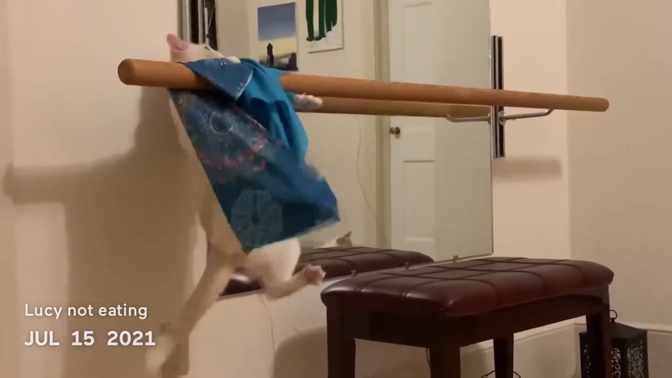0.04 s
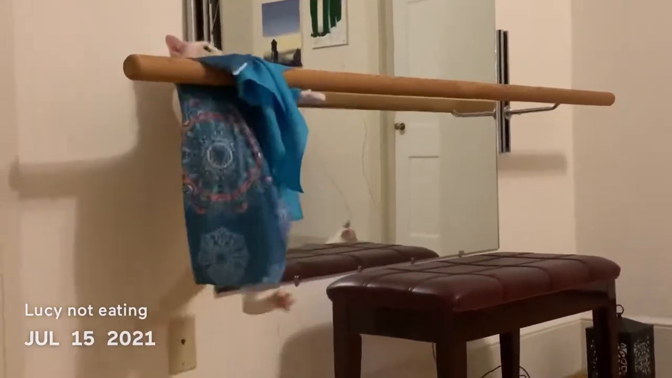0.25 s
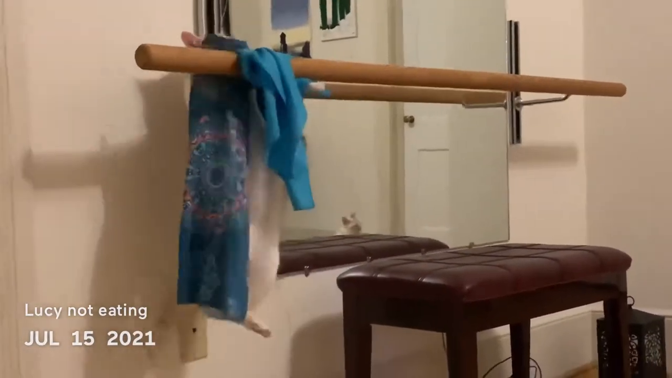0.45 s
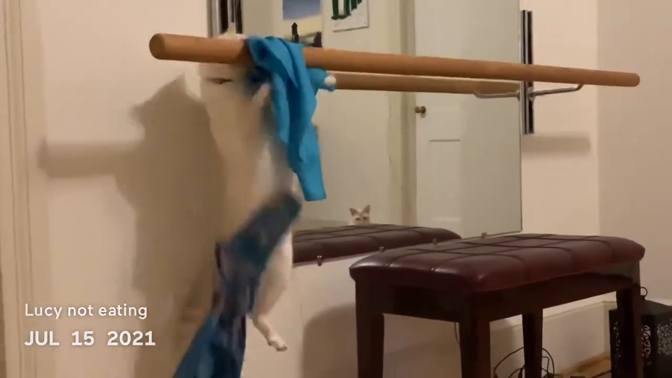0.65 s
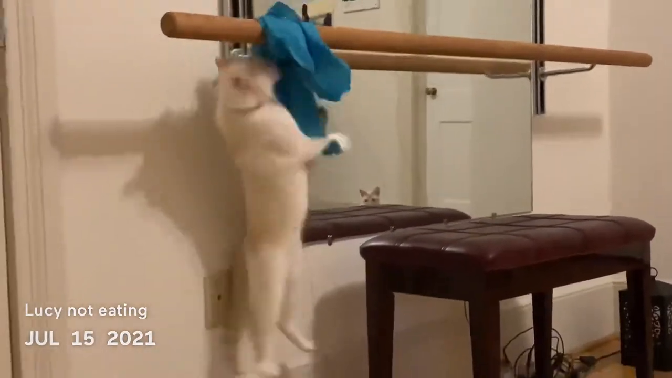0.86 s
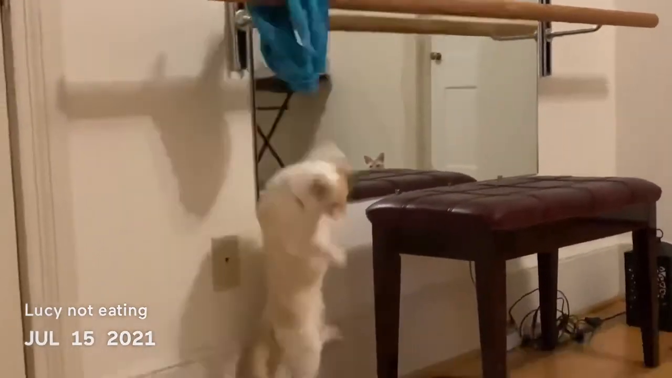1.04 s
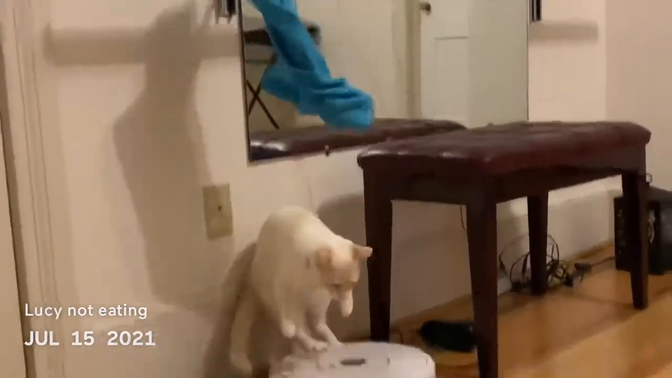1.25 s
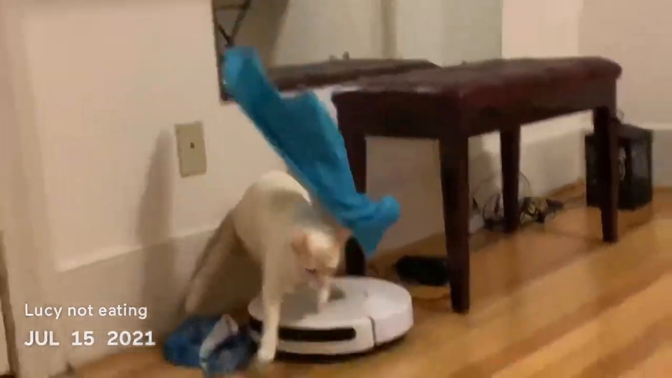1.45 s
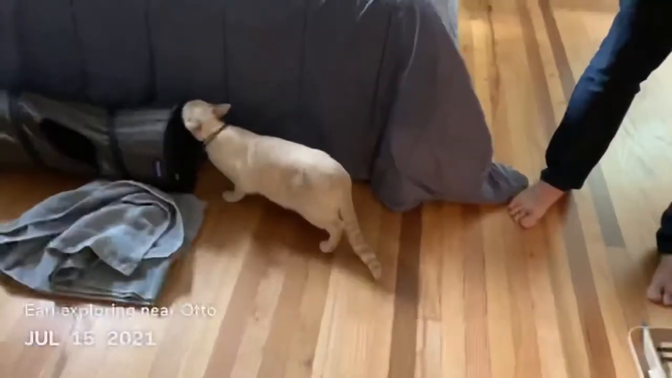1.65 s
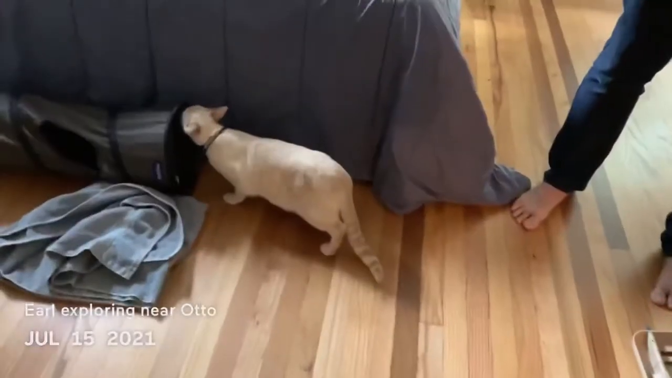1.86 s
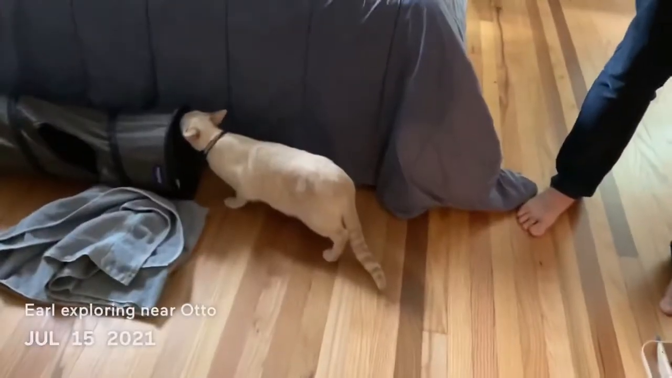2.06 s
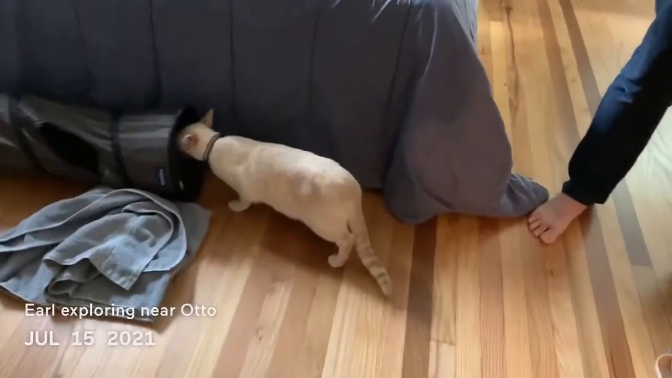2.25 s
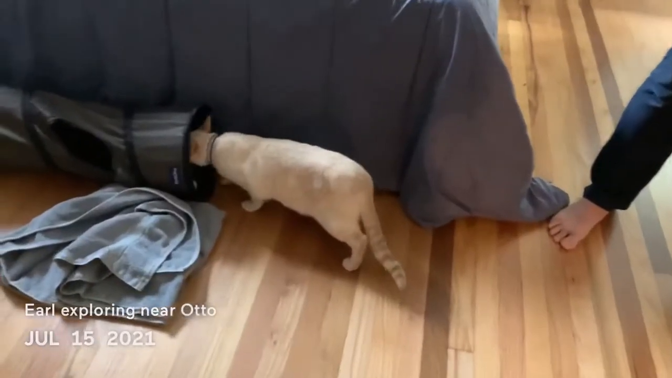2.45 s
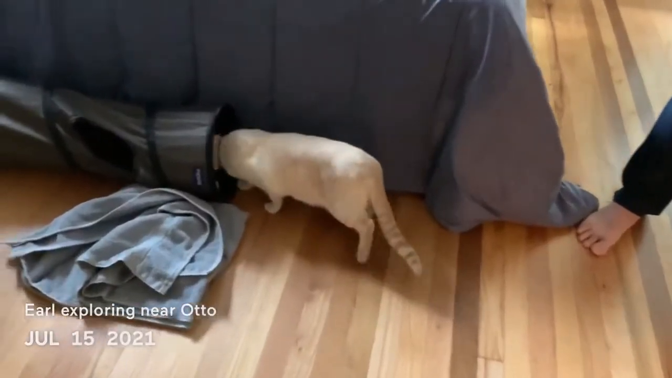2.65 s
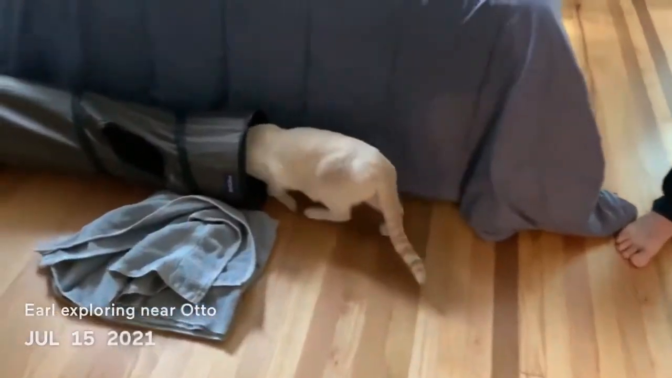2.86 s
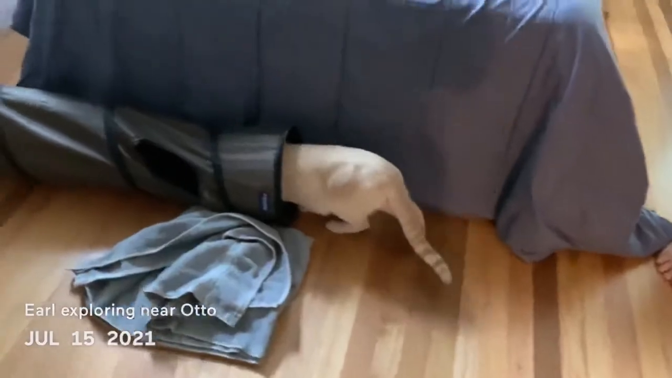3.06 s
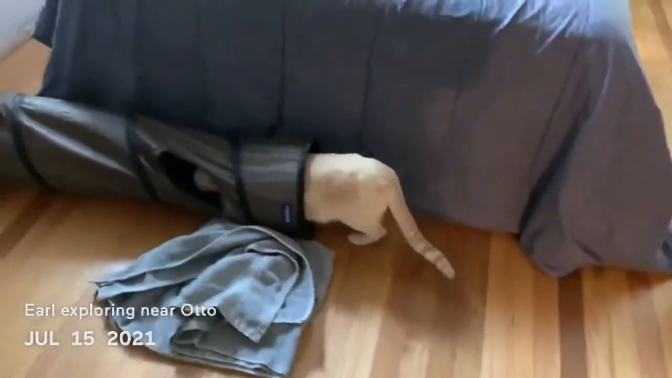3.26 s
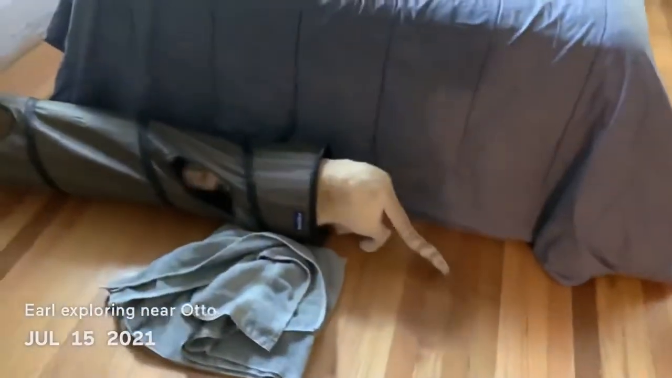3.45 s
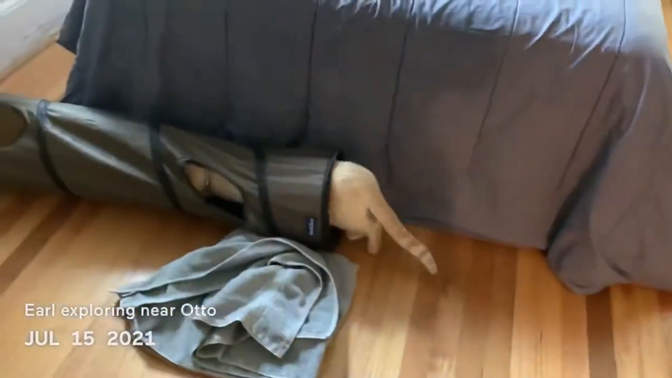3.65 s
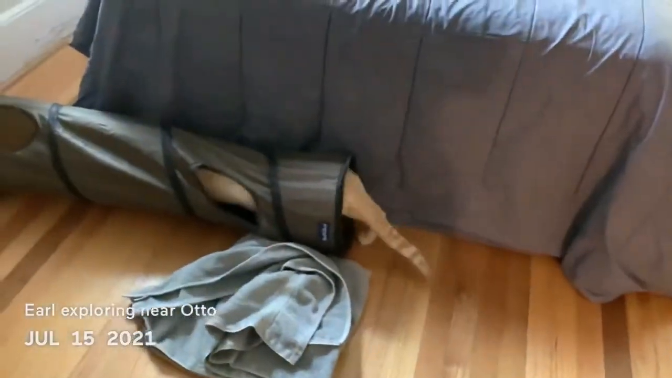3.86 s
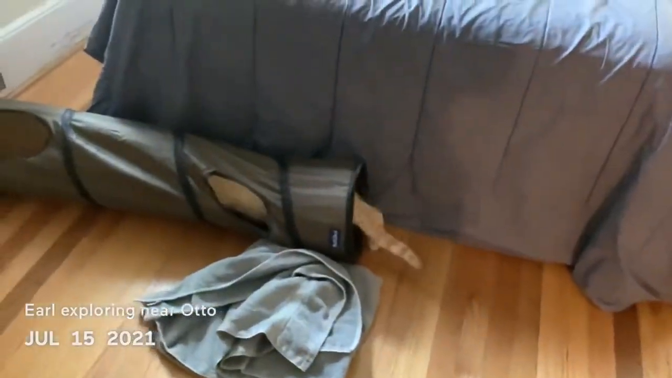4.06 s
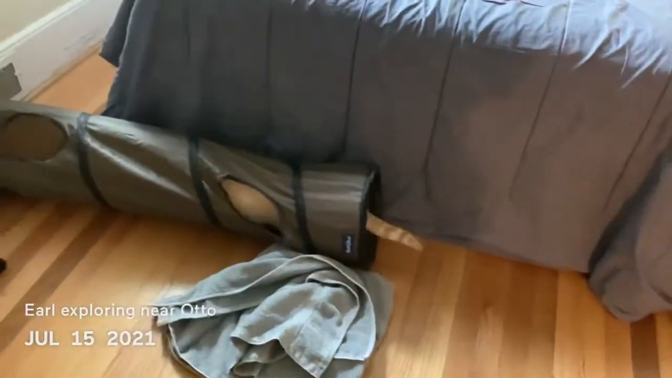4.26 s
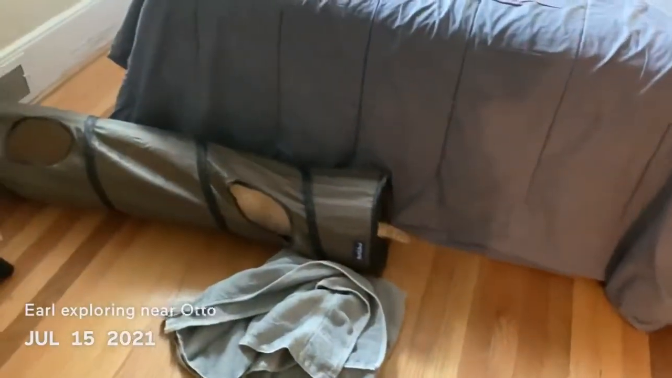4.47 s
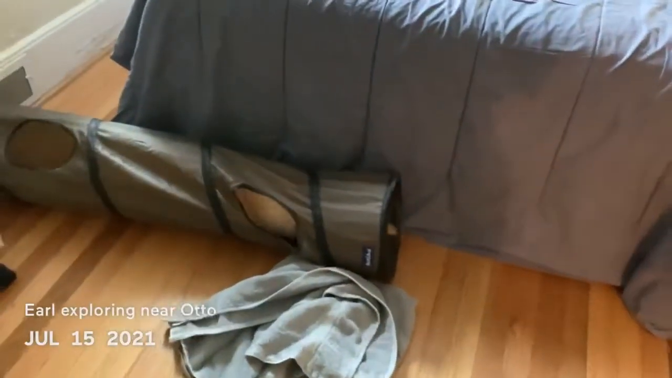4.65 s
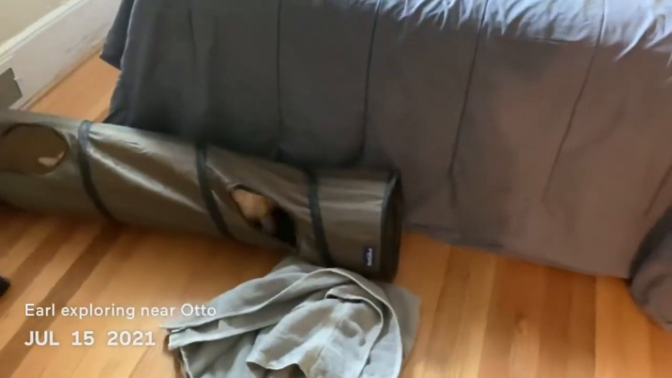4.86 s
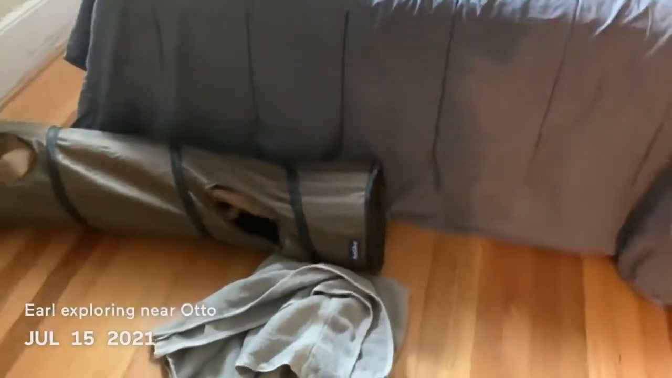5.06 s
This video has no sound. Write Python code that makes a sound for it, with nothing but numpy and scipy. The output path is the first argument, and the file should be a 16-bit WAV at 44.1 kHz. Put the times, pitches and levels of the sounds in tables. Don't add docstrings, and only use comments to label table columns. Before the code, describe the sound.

A cat claws and tugs cloth on a humming wooden bar, drops onto hollow plastic, then another crinkles into a fabric tunnel before a short meow.

```python
import sys
import numpy as np
from scipy import signal
from scipy.fft import rfft, irfft
from scipy.io import wavfile
from scipy.ndimage import uniform_filter1d

SR = 44100
rng = np.random.default_rng(int(sys.argv[2]) if len(sys.argv) > 2 else 0)


def log_audio(samples):
    frames = np.atleast_2d(samples).T
    limited = np.clip(frames, -1, 1)
    pcm = np.round(limited * 32767).astype(np.int16)
    wavfile.write(sys.argv[1], SR, pcm)


def gain_from_db(level_db):
    decades = np.asarray(level_db, float) / 20
    return 10 ** decades


N = 225306
TIME = np.arange(N) / SR
CUT_S = 1.499
IN_HALL = TIME < CUT_S
PORT_LAG = 20


def evened(x):
    return x / np.sqrt(np.mean(x ** 2) + 1e-20)


def peaked(x):
    return x / np.abs(x).max()


def read(points, hz):
    f, value = np.transpose(points)
    return np.interp(np.log(hz + 1), np.log(f + 1), value)


def add(mix, s, sound):
    part = mix[:, round(s * SR):][:, :sound.shape[1]]
    part += sound[:, :part.shape[1]]


def smoothed(x, size):
    return uniform_filter1d(uniform_filter1d(x, size), size)


def band(x, lo_hz, hi_hz):
    edges = [lo_hz, min(hi_hz, .45 * SR)]
    return signal.sosfilt(signal.butter(2, edges, "band", fs=SR, output="sos"), x)


def steep_band(x, lo_hz, hi_hz):
    return band(band(x, lo_hz, hi_hz), lo_hz, hi_hz)


def resonate(x, modes):
    out = 0
    for hz, width, db in modes:
        r = np.exp(-np.pi * abs(width) / SR)
        poles = [1, -2 * r * np.cos(2 * np.pi * hz / SR), r * r]
        out = out + gain_from_db(db) * signal.lfilter([(1 - r * r) / 2, 0, (r * r - 1) / 2], poles, x)
    return out


def gestures(starts, holds, dbs, releases, rise):
    t = np.arange(0, N / SR + .01, .001)[:, None]
    fall = np.maximum(releases, .01)
    before = np.maximum(starts - t, 0) / (max(rise, .01) * fall)
    after = np.maximum(t - starts - abs(holds), 0) / fall
    power = gain_from_db(dbs - 20 * (before + after)) ** 2
    return np.interp(TIME, t[:, 0], np.sqrt(power.sum(1)))


# f/Hz, likeness [0-1]
PORT_LIKENESS = [(60, 0.85), (130, 0.96), (290, 0.67), (640, 0.092), (1400, 0.048), (3100, 0.29),
                 (6800, 0.34), (15000, 0.2)]


def coloured(x, spectrum):
    hz = np.fft.rfftfreq(N, 1 / SR)
    left, other = rfft(x)
    same = np.clip(read(PORT_LIKENESS, hz), -1, 1)
    delayed = left * np.exp(-2j * np.pi * hz * PORT_LAG / SR)
    right = same * delayed + np.sqrt(1 - same ** 2) * other
    return evened(irfft(np.array([left, right]) * gain_from_db(read(spectrum, hz)), N))


def room(x, decays):
    taps = np.zeros((2, SR))
    at = np.arange(300, SR - 20, 20)
    at = at + rng.integers(0, 20, (2, len(at)))
    np.put_along_axis(taps, at, rng.choice([-1., 1.], at.shape), 1)
    hz, t, z = signal.stft(taps, SR, nperseg=256)
    t60 = np.maximum(read(decays, hz), .05)[:, None]
    tail = signal.istft(z * gain_from_db(-60 * t / t60), SR, nperseg=256)[1]
    return signal.fftconvolve(x, tail / np.linalg.norm(tail[0]), axes=1)[:, :N]


# f/Hz, level/dB per Hz
HALL_TONE = [(20, -8), (60, -3.5), (110, -11.5), (240, -21.5), (500, -33), (1300, -31.5), (3500, -33.5),
             (7000, -58), (10000, -70), (15000, -44)]
BEDROOM_TONE = [(20, -21.5), (59, -3), (170, -10.5), (260, -11), (450, -21), (940, -30.5), (1500, -36.5),
                (2200, -37.5), (3500, -38.5), (7200, -46), (8600, -37), (10800, -40.5), (15000, -40)]


def air(in_hall):
    spectrum, db = (HALL_TONE, -53.5) if in_hall else (BEDROOM_TONE, -65)
    drift = smoothed(rng.standard_normal((2, N)), 2500)
    tone = coloured(rng.standard_normal((2, N)), spectrum)
    low = signal.sosfiltfilt(signal.butter(2, 600, fs=SR, output="sos"), tone)
    hiss = gain_from_db(0.87 * evened(drift[0])) * (tone - low)
    rumble = gain_from_db(4.46 * evened(drift[1]) - 1.5) * low
    return gain_from_db(db) * (hiss + rumble)


def loads(rows, rise, rings):
    s, hum_db, knock_db, release = np.transpose(rows)
    hum = gestures(s, 0 * s, hum_db, rings * release, rise)
    return np.array([hum, gestures(s, 0 * s, knock_db, release, rise)])


# t/s, hum level/dB, creak level/dB, release/s per 20 dB
JERKS = [(0.0, -61.5, -64, -0.3), (.108, -50.5, -74, 0.6), (.25, -59, -61, 0.4), (.39, -46.5, -64, 0),
         (.43, -64, -71, 5), (.564, -34, -59, -0.7), (.61, -40.5, -69, -0.4), (.7, -42, -74, 0.2),
         (.81, -32, -37, 0.22), (.9, -38, -65, 0.27), (1.0, -33, -34, 0.32), (1.128, -41, -47, -0.63),
         (1.25, -37, -67, 0.1), (1.345, -51, -31.5, .13)]
# t/s, sway level/dB, footfall level/dB, release/s per 20 dB
STEPS = [(1.57, -63, -67, 0), (1.7, -70, -58.5, 0.03), (1.84, -62, -79, 1.2), (2.06, -62, -69, 0.2),
         (2.31, -59, -51, 0.26), (2.58, -54, -75, 0), (2.73, -49, -57.5, 0.3), (2.9, -54, -57, .5),
         (3.3, -62, -64.5, 0.6), (3.46, -58, -65, 0.23), (3.58, -63, -63.5, 0.2), (3.67, -57, -60.5, 0.3),
         (3.74, -50, -73, -0.1), (3.84, -47.5, -69, 0), (3.96, -55, -69, -1.9), (4.03, -55.5, -66, 0.43),
         (4.26, -59, -65.5, 0.6), (4.4, -93, -88, 9), (4.51, -81, -63, 0.7), (4.75, -51.5, -56.5, 0.08),
         (4.8, -46, -71.5, -0.94), (4.89, -63, -63.5, 0), (5.08, -68, -65, -0.6)]
# f/Hz, width/Hz, level/dB
BAR = [(72, 1.36, 7.5), (56.5, 5.7, -8.5)]
FLOOR = [(56.1, 17, 0)]
BOARDS = [(127.1, 24, 7), (163.3, 22, 3.5), (227.4, 45, 1), (291, 14, 2), (365, 9.2, -6), (424, 25, -8.5)]
LID = [(252, 30, -9), (299.3, 29, -1.5), (362, 31, -1.5), (428.5, 18, -4)]


def weight():
    jerks = loads(JERKS, rise=0.11, rings=2.8)
    steps = loads(STEPS, rise=0.52, rings=1)
    sway, knock = np.where(IN_HALL, jerks, steps)
    shake, lumps = rng.standard_normal(N), rng.standard_normal((2, N))
    bar = resonate(shake, BAR)
    bar = bar / np.sqrt(uniform_filter1d(bar ** 2, 5000))
    hum = np.where(IN_HALL, bar, evened(resonate(resonate(shake, FLOOR), FLOOR)))
    lumps = lumps + 2.55 * lumps[0]
    on_lid = abs(TIME - 1.41) < .09
    lid = evened(resonate(resonate(lumps, LID), LID) + 0.19 * resonate(lumps, BOARDS[:2]))
    wood = np.where(on_lid, lid, evened(resonate(lumps, BOARDS)))
    return gain_from_db(-5.5) * sway * hum + gain_from_db(-1.5) * knock * evened(band(wood, 134, 475))


# t/s, level/dB peak, f/Hz, t60/s
KNOCKS = [(.807, -33, 488, .06), (1.046, -37, 2037, 0.096), (1.062, -29, 607, 0.025),
          (1.122, -37.5, 121, 0.077), (1.0, -29.5, 312, 0.11), (2.29, -50, 302, 0.088),
          (2.335, -50, 320, 0.14), (2.7, -53, 109, .1), (2.844, -50.5, 1218, .07), (2.884, -50, 202, .05),
          (2.986, -42.5, 175, 0.037), (3.0, -49, 2146, 0.06), (3.045, -49.5, 2150, .04),
          (3.44, -54.5, 280, 0.041), (3.455, -56, 51.6, 0.11), (3.646, -52, 112, .06),
          (3.955, -52.5, 240, 0.06),
          (.9855, -25, 150, .035),
    (.989, -30, 320, .05),
    (1.3435, -25, 300, .025),
    (.813, -30, 140, .04),
    (1.36, -34, 365, .16),
    (1.4, -34, 390, .12),
]
# t/s, level/dB peak
CLINKS = [
    (1.216, -46.5),
    (1.2255, -35),
]
# f/Hz, width/Hz, level/dB
STEEL = [(6600, 25, -2), (8850, 25, -5), (9900, 90, -2), (10500, 150, 0), (12900, 60, -6), (14800, 80, -7)]


def knocks():
    out, t = np.zeros((2, N)), np.arange(8000) / SR
    for s, db, hz, t60 in KNOCKS:
        ring = gain_from_db(db - 60 * t / max(t60, .01)) * np.sin(2 * np.pi * hz * t)
        add(out, s, np.array([ring, np.roll(ring, PORT_LAG * (hz < 700))]))
    for (s, db), noise in zip(CLINKS, rng.standard_normal((len(CLINKS), 8000))):
        strike = noise * np.exp(-t / 0.0014)
        steel = peaked(sum(gain_from_db(m[2]) * peaked(resonate(strike, [m])) for m in STEEL))
        clink = gain_from_db(db) * (steel * .5 + peaked(band(strike, 6000, 16000)))
        add(out, s, np.array([clink, np.roll(clink, PORT_LAG)]))
    return out


def strokes(rows, rise, treble):
    s, hold, db, bright_db, release = np.transpose(rows)
    body = gestures(s, hold, db, release, rise)
    return np.array([body, gestures(s, hold, db + bright_db, treble * release, rise)])


# t/s, hold/s, level/dB, brightness/dB, release/s per 20 dB
DRAGS = [
    (0.0, 0.6, -52.5, -0.5, -1.3),
    (.33, 0.012, -48.5, -0.5, 0.3),
    (.741, 0.049, -44, -15, -0.96),
    (.797, 0.037, -35, -4, -0.09),
    (.968, 0.028, -39.5, -4.5, 0.68),
    (1.045, 0.021, -42.5, 10.5, 0.0658),
    (1.218, 0.037, -50, 7.5, 0.1),
    (1.333, 0.0053, -47, 14.5, 0),
]
# t/s, hold/s, level/dB, brightness/dB, release/s per 20 dB
PUSHES = [(1.58, 0.25, -70, -16, 0.6), (2.082, 0.1, -63, 5, 0.5), (2.28, 0.017, -56.5, 9, 0.42),
          (2.516, 0.0085, -65, -3, 0.5), (2.62, 0.043, -72, -14, .2), (2.718, 0.0059, -64, 2, 0.9),
          (2.846, .01, -52.5, -29, 0.27), (2.92, .01, -52, -8, 0.13), (2.888, 0.016, -53, -1.5, 0.35),
          (2.948, 0.026, -48.5, -21, 0.28), (3.0, 0.047, -47, -10.5, 0.09), (3.045, 0.032, -53, -8, -0.14),
          (3.1, 0.01, -58, -8, 0.37), (3.59, 0.03, -60.5, -4.5, 0.9), (3.643, 0.0049, -48, -2, 0.33),
          (3.75, 0.02, -69, -4, 0.3), (3.88, .02, -70.5, -1, 0.6), (4.12, 0.04, -65.5, -3, 2.2),
          (4.405, 0.018, -65.5, 0.5, 0.95), (4.735, 0.13, -65, 1.5, 0.6)]
# t/s, hold/s, level/dB, release/s per 20 dB
NAP = (3.39, .19, -76, .1)
# f/Hz, level/dB per Hz
CLOTH = [(150, -12.5), (414, -6), (1170, -9), (2550, -10.5), (5000, -23), (7500, -28.5), (10000, -28),
         (13500, -38.5), (15000, -36)]
# f/Hz, width/Hz, level/dB
CLOTH_RING = [(1620, 60, 1), (2500, 70, 7.5), (3550, 120, 4)]


def rubbing():
    drags = strokes(DRAGS, rise=0.4, treble=1.5)
    pushes = strokes(PUSHES, rise=0.072, treble=0.36)
    body, treble = np.where(IN_HALL, drags, pushes)
    clumps = gain_from_db(2.5 * evened(smoothed(rng.standard_normal(N), 250)))
    sizes = gain_from_db(1.54 * np.minimum(rng.exponential(1, (2, N)), 5))
    slips = clumps * sizes * (rng.random((2, N)) < 2500. / SR)
    fibres = evened(slips * rng.standard_normal((2, N))) + 1.2 * rng.standard_normal((2, N))
    cloth = coloured(fibres, CLOTH)
    taut = (TIME < .6) * resonate(cloth, CLOTH_RING) * .9
    nap = gestures(*np.transpose([NAP]), .5) * evened(steep_band(cloth, 1600, 3200))
    rub = gain_from_db(-6.5) * body * (evened(band(cloth, 260, 2150)) + taut)
    return nap + rub + gain_from_db(-9.5) * treble * evened(band(cloth, 2910, 24000))


def blows(events, hollow, ring_width, crack_s, thud_s, thud_db, thin_db, pan_db):
    near, walls, t = np.zeros((2, N)), np.zeros((2, N)), np.arange(6000) / SR
    bands = (500, 2710), (3000, 7000), (7500, 17600)
    pan = gain_from_db(np.array([[.5], [-.5]]) * pan_db)
    for (s, peak_db, hz, edge_db, tick_db), noise in zip(events, rng.standard_normal((len(events), 2, 6000))):
        snap = 1. * (t == 0)
        crack = noise[0] * np.exp(-t / crack_s)
        gains = gain_from_db(peak_db + np.array([0, edge_db - 8, tick_db + 8.5]))
        plain, direct = [sum(g * peaked(steep_band(x, *b)) for g, b in zip(gains, bands))
                         for x in (snap, 6.0 * snap + crack)]
        octaves = np.log2(hz / 1e3)
        ring = peaked(resonate(crack, [(hz, ring_width * hz / 1e3, 0)]))
        ring = gain_from_db(peak_db - 1 - 4 * octaves) * ring
        push = noise[1] * t / thud_s * np.exp(-t / thud_s)
        thud = gain_from_db(peak_db + thud_db - thin_db * octaves) * peaked(resonate(push, hollow))
        add(near, s, pan * (np.array([direct, np.roll(direct, PORT_LAG)]) + 1.6 * ring + thud))
        echoed = plain + .4 * thud + .35 * ring
        add(walls, s, np.array([echoed, echoed]))
    return np.array([near, walls])


# t/s, level/dB peak, ring f/Hz, edge level/dB, tick level/dB
KICKS = [
    (.553, -62.5, 613, -30, -35),
    (.59, -70, 626, -31, -37),
    (.68, -72, 576, -34, -35),
    (.705, -72, 600, -30, -35),
]
# f/Hz, width/Hz, level/dB
WALL = [(78, 19, -12), (126, 12, 12)]


def kicks():
    return blows(KICKS, WALL, ring_width=170.0, crack_s=0.002, thud_s=0.0092, thud_db=20.5, thin_db=-3.5, pan_db=1.5)


# t/s, level/dB peak, ring f/Hz, edge level/dB, tick level/dB
SNAPS = [(1.665, -69, 1860, 8, -26.5), (1.804, -71, 918, 8, -4), (2.083, -48.5, 1760, -20, -6),
         (2.168, -50.5, 2220, -23, -13), (2.221, -46.5, 1660, 4.5, 0), (2.246, -48.5, 1240, -29, -6),
         (2.288, -39.5, 1030, -32, -1.5), (2.335, -39.5, 1100, -3, -7.5), (2.514, -46.5, 1970, -2.5, -4.5),
         (2.717, -45.5, 2220, -2, -25), (2.844, -49, 1150, -30, -44), (2.883, -48, 2240, -14, -9),
         (2.888, -54.5, 2500, -8, -2), (2.918, -51, 1990, -49, -27), (2.947, -53.5, 1060, -35, -38),
         (2.959, -49.5, 820, -22, -36), (2.999, -48.5, 890, -28, -28), (3.044, -48, 815, -21.5, -22),
         (3.1, -71, 900, -30, -43), (3.641, -39.5, 2050, -6, -16), (4.408, -58.5, 1820, -42, -21),
         (4.731, -55.5, 1160, -19, -7), (4.744, -55, 835, -17, -8), (4.869, -52, 2700, -31, -16),
         (5.073, -69.5, 890, 22, -1)]
# f/Hz, width/Hz, level/dB
TUNNEL = [(191, 30, -3), (290, 80, 7.5), (494, 93, -11)]


def snaps():
    return blows(SNAPS, TUNNEL, ring_width=130.0, crack_s=0.0027, thud_s=0.0085, thud_db=-2.5, thin_db=6.0, pan_db=-2.0)


# t/s, pitch f/Hz, effort level/dB, first harmonic level/dB, second harmonic level/dB
MEOW = [
    (4.03, 425, -73, 6, -10),
    (4.09, 520, -69, 5, -9),
    (4.12, 606, -65, -8, 0),
    (4.17, 622, -61, -7, 6),
    (4.25, 636, -61, 4, -3),
    (4.4, 636, -61, 1, -5),
    (4.49, 612, -61.5, -9, -1),
    (4.56, 594, -65, 5, -6),
    (4.66, 580, -73, 3, -4),
]
# f/Hz, level/dB
THROAT = [(550, -2), (650, 4), (1250, 0), (1900, -4), (2550, -8), (3150, -31), (3800, -27), (4450, -14),
          (5100, -40), (5750, -42), (6350, -27), (7000, -50)]
# f/Hz, width/Hz, level/dB
JAW = [(1165, 60, 8)]


def meow():
    s, *columns = np.transpose(MEOW)
    hz, effort_db, first_db, second_db = [np.interp(TIME, s, c) for c in columns]
    open_db = np.maximum(hz - 625, -45) * .1
    weak_db = np.clip(-57 - effort_db, 0, 14)
    creak = np.exp(-((TIME - 4.148) / .04) ** 4)
    closing = np.clip((TIME - 4.42) / .03, 0, 1)
    waver = evened(smoothed(rng.standard_normal((13, N)), 330))
    turns = np.cumsum(hz * (1 + (.006 + .0025 * weak_db) * waver[0])) / SR
    flutter = .8 * np.cos(2 * np.pi * np.cumsum(70 * (1 + .4 * waver[11])) / SR)
    upper = 0
    for k in range(2, 11):
        db = read(THROAT, k * hz) + open_db * np.log2(k) + second_db * (k == 2) + 4 * waver[k]
        upper = upper + gain_from_db(db) * np.cos(2 * np.pi * k * turns)
    halves = sum(np.cos(2 * np.pi * k * turns) for k in (1.5, 2.5))
    halves = creak * gain_from_db(-9 + 4 * waver[12]) * halves
    first = gain_from_db(first_db + (1.5 + 3 * closing) * waver[1]) * np.cos(2 * np.pi * turns)
    voice = (1 + closing * flutter) * first + (1 + flutter) * upper + halves
    voice = voice + closing * resonate(voice, JAW)
    breath = evened(band(rng.standard_normal(N), 650, 1300)) * (1 + np.cos(2 * np.pi * turns))
    breath = gain_from_db(-28 + 1.5 * weak_db + 12 * creak + 4 * closing) * breath
    gate = np.clip((TIME - s[0]) / 0.02, 0, 1) * np.clip((s[-1] - TIME) / 0.03, 0, 1)
    pan = gain_from_db(np.array([[-.6], [.6]]))
    return gain_from_db(effort_db - 1.5) * gate * (voice + breath) * pan


# t/s, level/dB peak, ring f/Hz, edge level/dB, tick level/dB
LANDING = [
    (1.328, -30.5, 2110, -2, -14.5),
    (1.344, -47.5, 570, -32, -42),
    (1.361, -51, 496, 19, -36),
    (1.403, -45, 526, -28, -28),
]


def landing():
    return blows(LANDING, LID, ring_width=140.0, crack_s=0.0037, thud_s=0.013, thud_db=-1.7, thin_db=4.0, pan_db=-4.0)


# t/s, level/dB peak, ring f/Hz, edge level/dB, tick level/dB
CLAWS = [(0.621, -58, 890, -20, -31), (0.74, -46, 595, -36, -37), (0.804, -38, 540, -27.5, -16),
         (0.974, -43.5, 705, -35, -29), (0.984, -35.5, 1330, -21.5, -13), (0.995, -35, 567, -35.5, -13.5),
         (1.048, -28.5, 1920, -17, -15.5), (1.066, -41, 594, -27.5, -29), (1.035, -35, 2280, -20, -19),
         (1.08, -39.5, 1900, -23, -20), (1.1, -40.5, 1500, -21, -25)]
# f/Hz, width/Hz, level/dB
BRACKET = [(156, 80, -3), (335, 70, -3.5), (565.7, 11, 4.5)]


def claws():
    return blows(CLAWS, BRACKET, ring_width=190.0, crack_s=0.0025, thud_s=0.01, thud_db=-3.0, thin_db=9.0, pan_db=1.0)


# f/Hz, t60/s
HALL = [(100, 0.31), (300, 0.62), (1000, 0.63), (4000, 0.58), (12000, 0.22)]
BEDROOM = [(100, 0.94), (300, 0.51), (1000, 0.52), (4000, 0.42), (12000, 0.12)]


def scene():
    t = TIME - CUT_S
    hits, call, crinkle = knocks(), meow(), snaps()
    clawing = claws() + landing()
    hall = clawing[0] + kicks()[0] + air(in_hall=True)
    hall += room(gain_from_db(7) * clawing[1] + gain_from_db(-9) * hits, HALL)
    bedroom = crinkle[0] + gain_from_db(-2.5) * call + air(in_hall=False)
    bedroom += room(gain_from_db(4) * crinkle[1] + gain_from_db(-9) * (call + hits * (t > 0)), BEDROOM)
    moving = rubbing() + weight() + hits
    fade_out = np.clip(.25 - t / 0.12, 0, 1) * (t < 0)
    fade_in = np.clip(0.01 + t / 0.12, 0, 1) * (t >= 0)
    return fade_out * hall + fade_in * bedroom + (np.clip(-t / 0.095, 0, 1) + fade_in) * moving


def low_pass(x):
    return signal.sosfilt(signal.butter(12, 16450, fs=SR, output="sos"), x)


def record(dry):
    heard = band(band(dry, 36, 18000), 33, 16000)
    hz, t, z = signal.stft(heard, SR, nperseg=256, noverlap=192)
    treble = (abs(z[:, (hz > 8000) & (hz < 11000)]) ** 2).sum((0, 1))
    click = treble > 20 * np.roll(uniform_filter1d(treble, 8), 8)
    emptied = ((hz > 10950) & (hz < 12300)) | (hz > 15250)
    z = z * np.where(emptied[:, None] & ~click, .003, 1)
    mix = signal.istft(z, SR, nperseg=256, noverlap=192)[1][:, :N]
    return low_pass(mix)


dry = scene()
out = record(dry)
log_audio(out)
```